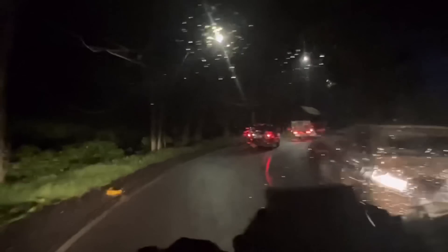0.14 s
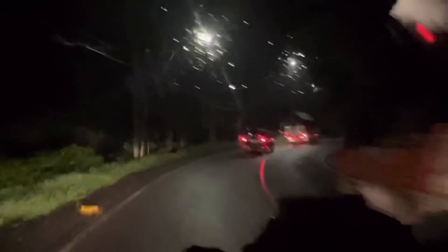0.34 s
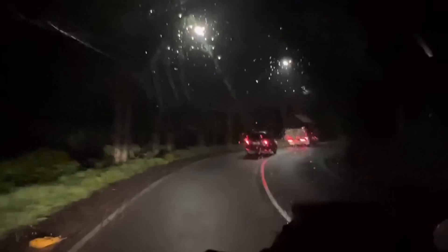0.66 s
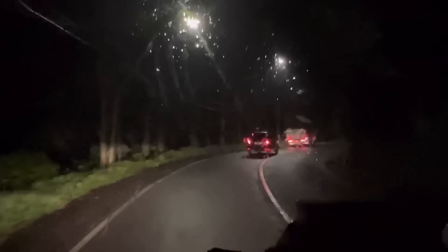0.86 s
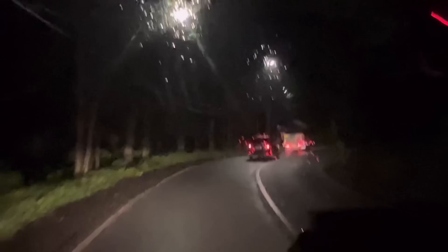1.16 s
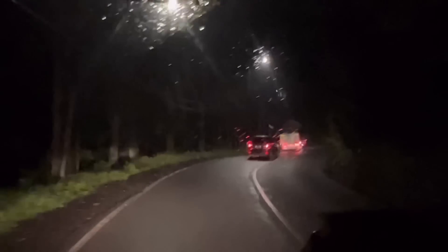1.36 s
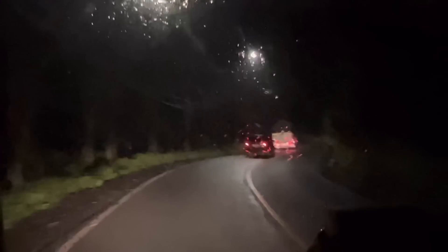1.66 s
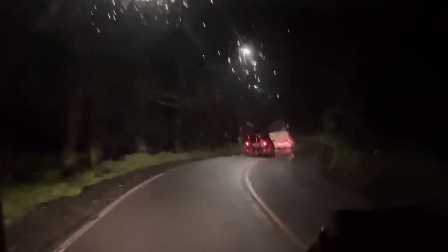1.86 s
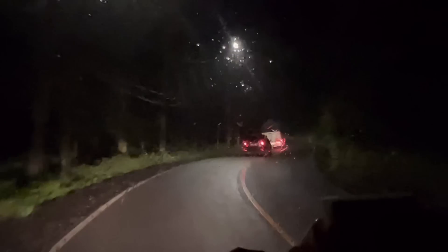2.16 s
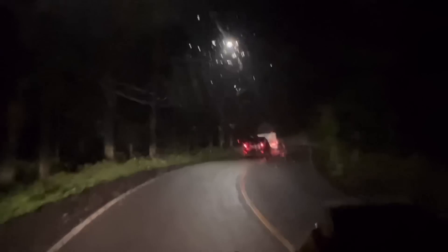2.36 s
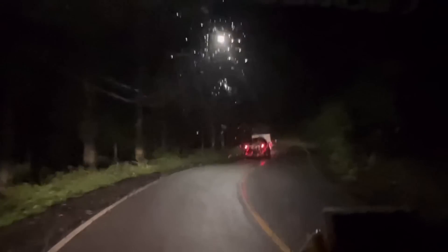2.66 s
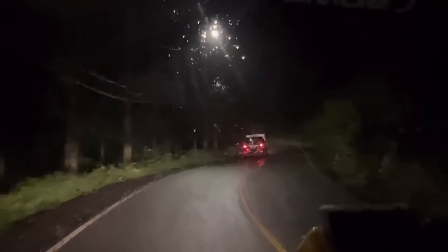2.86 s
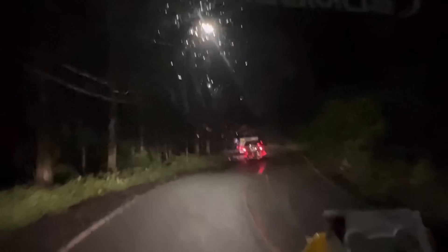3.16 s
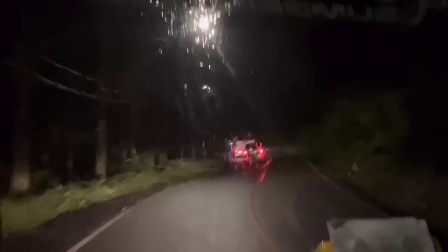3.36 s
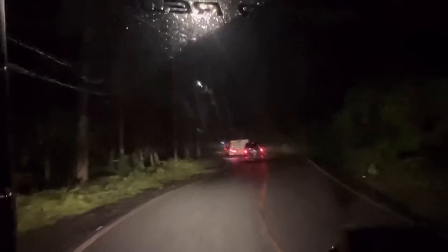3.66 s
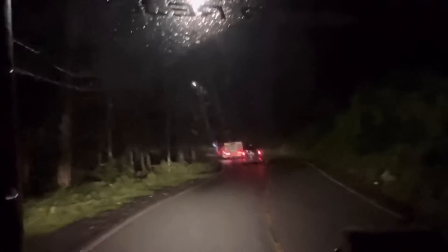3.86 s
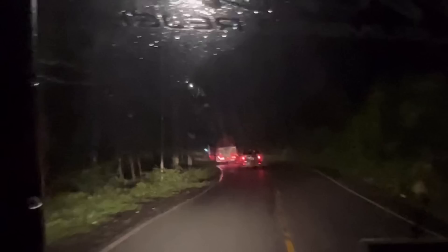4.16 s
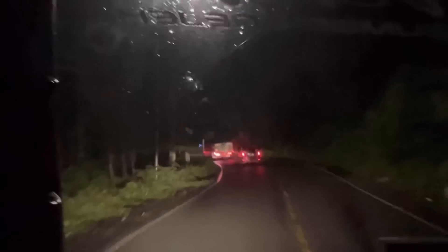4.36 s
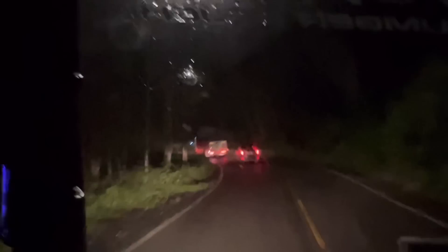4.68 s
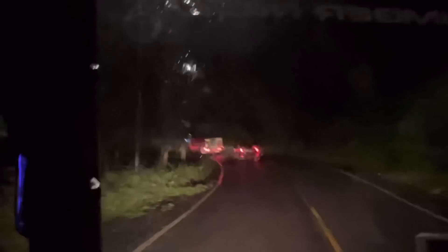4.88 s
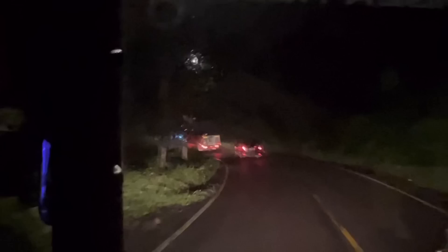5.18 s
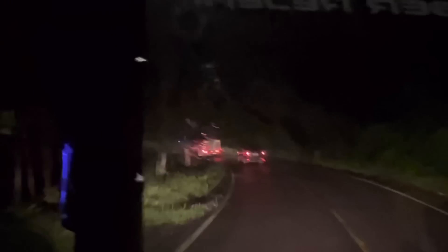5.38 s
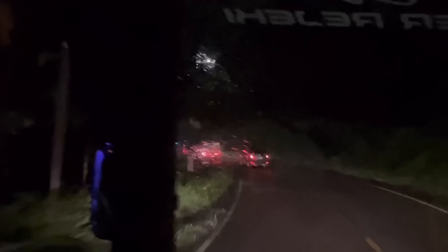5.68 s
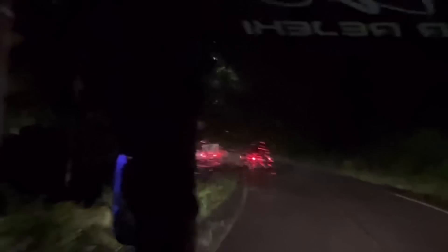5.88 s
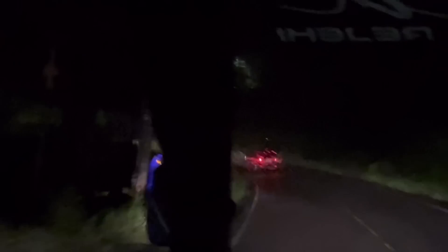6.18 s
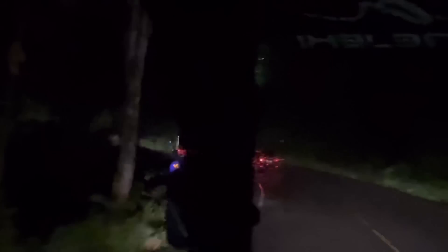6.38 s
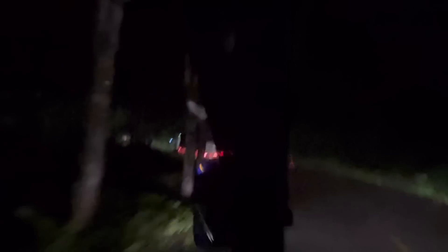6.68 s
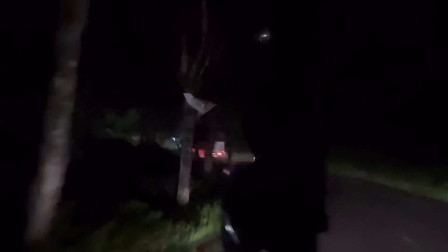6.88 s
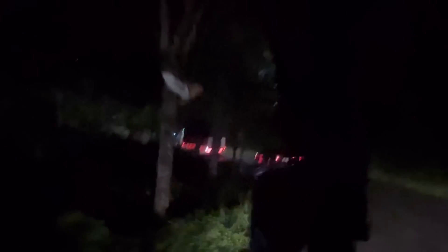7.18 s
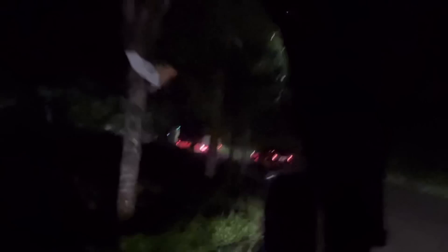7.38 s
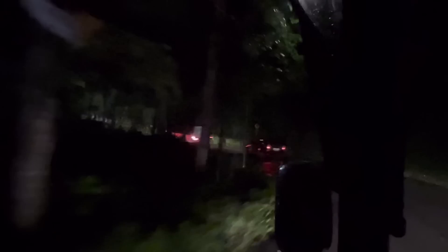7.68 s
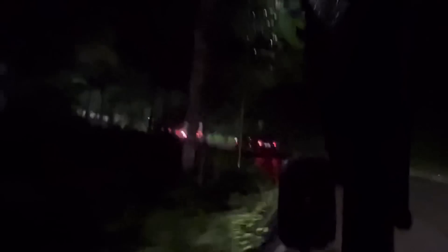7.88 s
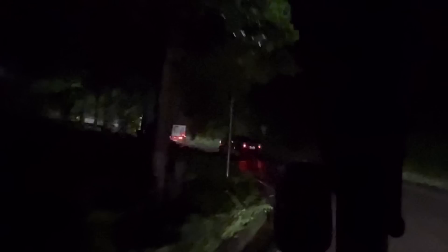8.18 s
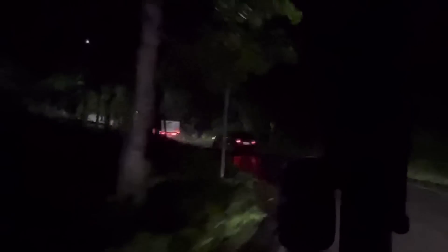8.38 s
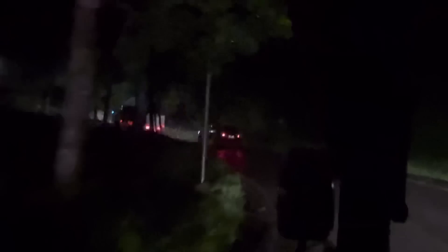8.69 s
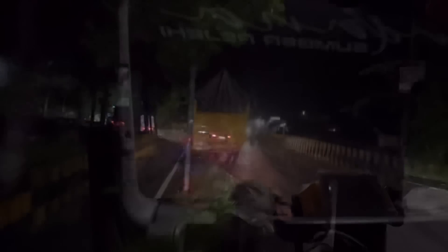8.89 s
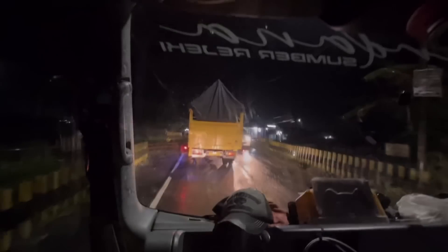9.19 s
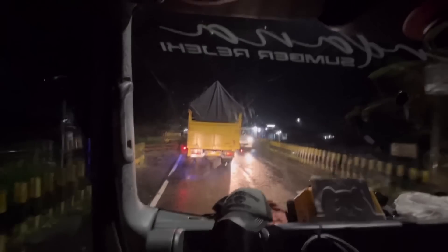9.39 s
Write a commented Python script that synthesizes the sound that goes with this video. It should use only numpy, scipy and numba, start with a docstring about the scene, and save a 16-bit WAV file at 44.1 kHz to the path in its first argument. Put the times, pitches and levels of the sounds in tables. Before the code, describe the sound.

A truck engine runs along a wet road, heard on a phone inside the cab with a side window open. Its low hum and growl climb slowly in pitch over deep body rumble, road roar, hissing spray and faintly ringing panels. Two oncoming cars swish past in the first second. From about 1.5 seconds a fluttering gear whine comes in, rising and growing louder, while a thin, high draught hiss drifts above. A few isolated gusts bump the microphone between 2 and 5.5 seconds. From about 6 to 9 seconds the wind thumps and slaps it in quick, irregular bursts, strongest around 6.5 to 7.3 seconds. The engine hum drops away between 7 and 8 seconds, leaving rumble, whine and wind. Around 9 seconds the road noise falls off and a slower, lower engine comes in, rising slightly until the end at 9.5 seconds.

```python
"""A truck engine pulls up a wet road at night, heard on a phone in the cab with the side window open.
Its firing makes a hum and a growl, joined by a cab drone and a gear whine, over body rumble, road roar
and spray hiss. A thin high hiss drifts, a draught sings, and oncoming cars swish past at the start.
Gusts thump and slap the phone's two microphone openings (ports), most of all around the time it turns
to the window. At the end the noise falls away and a slower engine takes over."""
import sys
import numpy as np
from scipy import signal
from scipy.fft import rfft, irfft, next_fast_len
from scipy.io import wavfile
from scipy.ndimage import uniform_filter1d
from numba import njit

SR = 44100
rng = np.random.default_rng(int(sys.argv[2]) if len(sys.argv) > 2 else 0)


def dump(signal):
    """Clip the signal to [-1, 1] and save it as 16-bit WAV at the path in sys.argv[1]."""
    limited = np.clip(np.atleast_2d(signal).T, -1, 1)
    pcm = np.round(limited * 32767).astype(np.int16)
    wavfile.write(sys.argv[1], SR, pcm)


N = 420713
T = np.arange(N) / SR
SIZE = next_fast_len(N)
HZ = np.arange(SIZE // 2 + 1) * SR / SIZE + 1e-3

# Levels in the tables are relative; the mix sets the final loudness.
# The engine. Each row: time in seconds, firing rate in Hz, load in dB.
ENGINE = [(0, 60.72, 0), (.8, 62.38, 0.5), (1.3, 63.5, -0.5), (2.0, 67.26, -1.5), (3.2, 71.03, -1.5),
          (4.8, 73.89, 1), (6.0, 74.77, 0.5), (6.8, 76.6, 2), (7.3, 76.56, -10), (8.0, 75.6, -15)]
# How the cab passes low and high multiples of the firing rate. Each row: frequency in Hz, level in dB.
CAB_LOW = [(60, -18.5), (62.3, -17.5), (63.3, -28.5), (65.5, -32), (67, -16.5), (71, -20.5), (74.2, -28.5),
           (76, -31), (121, -27.5), (126, -26.5), (131, -27), (136, -26), (142, -28.5), (146, -25),
           (154, -26.5), (183, -54), (204, -41), (226, -40)]
CAB_HIGH = [(230, -47), (260, -45), (320, -45.5), (380, -60), (440, -56), (500, -52), (580, -56),
            (660, -56), (730, -49), (790, -48), (880, -58), (960, -55), (1030, -50), (1100, -58),
            (1200, -54), (1270, -54), (1330, -54.5), (1450, -63), (1800, -64)]
# Three sounds that drift in pitch. Each row: time in seconds, pitch in Hz, level in dB.
DRONE = [(0, 79.5, -30), (1.2, 80.5, -25), (2.0, 78.4, -24), (3.2, 78.6, -24), (3.7, 79.5, -25),
         (4.4, 79.5, -23.5), (6.0, 81.4, -26), (6.4, 83, -31), (7.9, 84, -50), (8.4, 83, -22),
         (8.8, 84.5, -39)]
HIGH_HISS = [(0, 9800, -48.5), (1, 10260, -47), (4.7, 10530, -42), (5.6, 9524, -38), (6.1, 9700, -39.5),
             (6.5, 10550, -42), (7, 9540, -38), (7.5, 9510, -35.5), (8, 9060, -37.5), (9.1, 8980, -44),
             (9.54, 9200, -76)]
WHINE = [(1.6, 381.4, -42), (2.3, 386.7, -44), (3.0, 395.9, -36.5), (3.6, 404.3, -35.5), (4.0, 412.5, -33),
         (4.5, 418.6, -32), (5.1, 422.3, -29), (5.6, 423.5, -30), (6.2, 428.8, -31.5), (6.9, 428.5, -25),
         (7.4, 429.3, -33.5), (8.05, 431, -25), (8.35, 425.6, -42), (8.7, 420, -43), (9.0, 415, -41)]
# Ringing panels. Each row: pitch in Hz, width in Hz, dB against the road roar at low revs,
# the same at high revs, dB added when facing the window.
PANELS = [(695, 16, -27, -20, -3), (774, 14, -20, -15, -10), (1041, 12, -16, -13, -6),
          (1185, 12, -27, -19, 1), (1284, 20, -16, -10, 1.5), (1557, 13, -30, -21, 9),
          (1663, 22.26, -23, -18, 8.5), (2404, 140, -15, -18.5, -11)]
# The tone colour of five noises. Each row: frequency in Hz, level in dB.
RUMBLE_COLOUR = [(20, -34), (35, -13.5), (50, -4), (62, 0.5), (72, -4), (85, -7), (105, -9.5), (135, -15),
                 (160, -16), (230, -28.5), (400, -27)]
RASP_COLOUR = [(100, -4), (200, -4), (290, -0.5), (350, -3.5), (450, -5), (620, -7), (750, -4), (880, -5),
               (1100, -8), (1310, -12), (1400, -13.5), (2500, -23)]
ROAR_COLOUR = [(500, -13.5), (1000, -6.5), (1500, -2), (1750, -3), (2050, -3.5), (2400, -6.5), (2700, -7.5),
               (3200, -8.5), (5000, -27)]
SPRAY_COLOUR = [(1500, -24), (3000, -6), (4500, -0.5), (6000, 2.5), (7000, 3), (9000, -1), (10200, -17),
                (11200, -15), (12300, -16), (13500, -21), (14300, -29), (15200, -21), (16000, -22)]
SINGING_COLOUR = [(5500, -18), (6700, -6), (7400, 4), (8000, -6), (9000, -14), (10000, -26.5)]
# Loudness of the body rumble and the singing draught. Each row: time in seconds, level in dB.
RUMBLE_LEVEL = [(0, -22), (.8, -21), (1.6, -23.5), (2.2, -20), (3.3, -19.5), (4.7, -18), (5.9, -20),
                (6.2, -21), (6.62, -17.5), (6.93, -20.5), (7.5, -24), (7.9, -30.5), (8.5, -22.5),
                (9.4, -28), (9.54, -21.5)]
SINGING_LEVEL = [(0, -45.5), (1.3, -40), (1.9, -39.5), (2.6, -35), (4.5, -29), (5.2, -31.5), (5.9, -34),
                 (6.4, -31), (7.7, -31.5), (8.3, -38), (8.8, -37.5), (9.4, -54), (9.54, -54)]
# Oncoming cars throwing spray. Each row: middle in seconds, length in seconds.
PASSING_CARS = [(0, .25), (0.748, 0.36)]
# Draught on the ports between gusts. Each row: time in seconds, level in dB, air speed in m/s.
DRAUGHT = [(0, -50, 7.5), (2, -36, 6.1), (4, -37.5, 6.7), (5.8, -32, 5.04), (6.3, -24, 5.2),
           (6.9, -28.5, 6.5), (7.3, -21.5, 8.9), (7.4, -40, 5.1), (7.8, -33, 6.9), (8.6, -27, 12),
           (8.7, -55, 11), (9.22, -30.5, 8.2), (9.3, -45, 6.5), (9.54, -48, 5.9)]
# Gusts. Each row: middle in seconds, length in milliseconds, peak in dB, air speed in m/s.
GUSTS = [(2.363, 65, -22, 3), (4.231, 48, -23, 3.8), (4.466, 18.8, -17, 5), (4.549, 50, -17.5, 3.7),
         (5.396, 57, -18.5, 3.6), (5.972, 53, -20, 3.9), (6.053, 44, -17, 4.4), (6.196, 25, -11, 5.5),
         (6.246, 42, -20.5, 8.9), (6.316, 56, -20, 2.6), (6.505, 19, -10.5, 6.1), (6.572, 65, -15.5, 5.6),
         (6.645, 49, -10.5, 4.4), (6.795, 77, -21.5, 6.5), (6.866, 37, -12, 6.2), (6.909, 30, -15.5, 6.2),
         (6.955, 42, -19.5, 9.2), (7.001, 37, -16.5, 12), (7.08, 17, -16.5, 9.4), (7.106, 22, -17, 8.9),
         (7.195, 43, -17, 8.7), (7.228, 33, -18, 13), (7.281, 42, -15, 5.5), (7.318, 30, -16, 6.3),
         (7.442, 37, -23, 8.1), (7.547, 114, -28, 11.6), (7.717, 24, -24, 8.6), (7.815, 46, -20, 8.1),
         (7.871, 29, -21.5, 11.8), (7.995, 34, -18.5, 7.4), (8.088, 62, -18, 11), (8.2, 24, -22, 9.8),
         (8.277, 45, -23, 8.1), (8.357, 36, -18.5, 10.2), (8.417, 58, -21, 13), (8.505, 28, -22, 16),
         (8.575, 29, -16, 13.3), (8.624, 24, -17, 11.3), (8.841, 41, -21.5, 9.7), (8.885, 45, -25, 10),
         (8.932, 36, -22.5, 10.3), (9.033, 30, -30, 13), (9.166, 19, -20, 8.2)]
# Slaps of air. Each row: middle in seconds, level in dB, pitch in Hz, left over right in dB.
SLAPS = [(4.464, -17, 300.4, -3), (5.386, -12, 220, 1), (6.427, -16, 450, 0), (6.439, -9, 388, 1),
         (8.352, -15, 560, 2), (9.027, -15.5, 600, 2), (6.195, -12.0, 365.0, 1.0), (6.205, -8, 484.0, 3.0),
         (6.501, -7, 373.0, -2.0), (6.566, -15, 359.0, 5), (6.628, -21, 362.0, 5), (6.644, -5.5, 421.0, -1),
         (6.656, -16, 324.0, 6.0), (6.856, -5, 417.0, -3.0), (6.867, -9, 366.0, 4),
         (6.902, -11, 389.0, 10.0), (6.937, -8, 393, 4.0), (6.997, -14, 457.0, 0), (7.009, -15, 389.0, 1),
         (7.08, -8, 430, 1.0), (7.107, -5.0, 388.0, 1.0), (7.183, -6, 432.0, 4.0), (7.194, -13, 362.0, 1.0),
         (7.202, -8, 425.0, 0), (7.235, -5, 475.0, -2.0), (7.256, -6.0, 452.0, 1.0),
         (7.264, -1.5, 550.0, 1.0), (7.276, -6, 352, 3.0), (7.312, -12.0, 447.0, 1.0),
         (7.32, -6.5, 373.0, 3.0), (7.429, -17, 456.0, 4.0), (7.726, -14.0, 388.0, 5.0),
         (7.824, -19, 381.0, 6.0), (7.866, -12, 505.0, 4.0), (7.988, -16, 395.0, 4.0),
         (8.063, -7, 418.0, -1.0), (8.071, -13, 431.0, 1.0), (8.101, -11, 440, -2),
         (8.114, -11.0, 488.0, 5.0), (8.356, -15, 388.0, 3), (8.402, -10, 542.0, 1.0),
         (8.432, -14, 442, 7.0), (8.443, -10, 483.0, -3), (8.581, -7, 509.0, 0), (8.61, -9, 577.0, 0.0),
         (8.629, -9, 406.0, -4), (8.839, -15, 403.0, 5), (8.873, -18, 618.0, 2), (8.892, -19, 517.0, 10.0),
         (8.927, -18, 404.0, 3.0), (9.164, -14, 401.0, 2.0)]
# Brief dips in the low noise. Each row: middle in seconds, length in seconds, change in dB.
LULLS = [(7.38, 0.041, -1), (7.668, 0.067, -3.5), (8.75, 0.13, -4), (8.983, 0.076, -3),
         (9.263, 0.048, -2.5)]
# How alike the two ports sound. Each row: frequency in Hz, shared part from 0 to 1.
LIKENESS = [(60, 0.96), (200, 0.58), (400, 0.3), (700, 0.31), (1300, 0.093), (2300, 0.17), (5000, 0.24),
            (7500, 0.11), (8500, 0.29), (9400, 1), (12000, .99)]
# The left port's lag, bent by cab echoes. Each row: frequency in Hz, lag in radians.
LEFT_LAG = [(60, -0.2), (200, 0.43), (500, 1.44), (700, 1.5), (860, 4), (1100, 1.5), (1700, 2),
            (2400, -0.5), (3100, -1.9), (6500, 0.2)]
# The hand shading the right port. Each row: frequency in Hz, dB against the left port.
HAND_SHADE = [(50, -1.5), (200, -3), (400, -2), (1000, -4.5), (2500, -1.5), (3300, -8), (5000, -12),
              (6800, -12), (7700, -3.5), (8700, -0.5), (16000, 0)]
# Noise levels in dB: at low revs, at high revs, added by a car, added at the window, after the fade.
RASP_DB = (-36, -25.5, 2.5, -1.5, -31)
ROAR_DB = (-39.5, -33.5, 2.5, 0, -41)
SPRAY_DB = (-42, -33.5, 4.5, 0, -42.5)


def undb(db):
    """Turn decibels into a gain."""
    return 10 ** (np.asarray(db) / 20)


def unit(x):
    """Scale a signal to an average strength (rms) of 1."""
    return x / np.sqrt(np.mean(x ** 2))


def over_hz(table):
    """Join a table's points into a smooth curve over frequency."""
    hz, value = np.transpose(table)
    return np.interp(np.log(HZ), np.log(hz), value)


def over_time(table):
    """A table's columns as curves, plus a gate that fades any start or stop inside the scene."""
    s, *columns = np.transpose(table)
    fade_in = (T - s[0]) / .04 + (s[0] <= 0)
    fade_out = (s[-1] - T) / .04 + (s[-1] > 9.5)
    return [np.interp(T, s, c) for c in columns] + [np.clip(np.minimum(fade_in, fade_out), 0, 1)]


def walk(rate):
    """A smooth random wobble of size about 1, with `rate` new values a second."""
    hold = int(SR / rate)
    steps = np.repeat(rng.standard_normal(N // hold + 1), hold)
    return 1.3 * uniform_filter1d(uniform_filter1d(steps, hold), hold)[:N]


def bump(s, length):
    """A blunt rise and fall that reaches 1 at time s."""
    return np.exp(-np.log(2) * (np.abs(T - s) / (length / 2)) ** 4)


@njit
def moving_filter(x, hz, damping, lowpass):
    """Keep the sound near a moving frequency, or all below it if lowpass is set."""
    y, band, low = np.empty(len(x)), 0., 0.
    for i in range(len(x)):
        g = np.tan(np.pi * hz[i] / SR)
        v = (band + g * (x[i] - low)) / (1 + g * (g + damping))
        y[i] = low + g * v if lowpass else damping * v
        band, low = 2 * v - band, low + 2 * g * v
    return y


def narrow_noise(hz, damping):
    """Noise around one pitch; less damping makes it narrower."""
    return moving_filter(rng.standard_normal(N), hz, damping, False)


def ports(common, own, share):
    """Spectra at both ports: a shared part, shifted on the left, plus each port's own part."""
    share = np.clip(share, 0, 1)
    # high up, the left port is flipped and hears the path round the case, 13 samples late
    round_case = -np.exp(-2j * np.pi * HZ * 13 / SR)
    left = np.where(HZ < 6500, np.exp(-1j * over_hz(LEFT_LAG)), round_case)
    return np.sqrt(share) * common * np.array([left, np.ones_like(left)]) + np.sqrt(1 - share) * own


def wide_noise(colour, swell_db, flicker_db):
    """Coloured noise at both ports; its octaves swell together and flicker alone."""
    common, *own = rfft(rng.standard_normal((3, SIZE)))
    pair = ports(common, np.array(own), over_hz(LIKENESS)) * undb(over_hz(colour))
    out, swell = 0, swell_db * walk(1.46)
    for octave in np.arange(np.floor(np.log2(colour[0][0])), np.log2(colour[-1][0]) + 1):
        band = np.cos(np.pi / 2 * np.clip(np.log2(HZ) - octave, -1, 1)) ** 2
        out = out + undb(swell + flicker_db * walk(9)) * irfft(pair * band, SIZE)[:, :N]
    return unit(out)


def tones(hz, levels_db, gate, waver, flutter_db, pace=8):
    """Multiples of one slightly wavering pitch, each fluttering in level."""
    phase = 2 * np.pi * np.cumsum(hz * (1 + waver * walk(6))) / SR
    return gate * np.sqrt(2) * sum(undb(db + flutter_db * walk(pace)) * np.sin((k + 1) * phase + k)
                                   for k, db in enumerate(levels_db))


def revs(low_hz=60, high_hz=77):
    """How fast the engine fires: 0 at low revs, 1 at high revs."""
    return (over_time(ENGINE)[0] - low_hz) / (high_hz - low_hz)


def passing():
    """How near an oncoming car is, from 0 to 1."""
    return sum(bump(s, length) for s, length in PASSING_CARS)


def facing(start_s=6.9, length_s=.3):
    """How far the phone has turned to the window, from 0 to 1."""
    return np.clip((T - start_s) / length_s, 0, 1)


def driving_gain(low_db, high_db, car_db, window_db, end_db):
    """Noise grows with the revs and passing cars, fades late on, then rises at the very end."""
    driving_db = low_db + (high_db - low_db) * revs() + car_db * passing() + window_db * facing()
    fade = np.clip((T - 8.64) / .53, 0, 1)
    recovery_db = 9.5 * np.maximum(T - 9.24, 0)
    return undb((1 - fade) * driving_db + fade * end_db + recovery_db)


def engine_hum():
    """The first three multiples of the firing rate, shaped by the cab."""
    hz, load_db, gate = over_time(ENGINE)
    levels_db = [load_db + np.interp(k * hz, *np.transpose(CAB_LOW)) for k in range(1, 4)]
    return tones(hz, levels_db, gate, waver=.0015, flutter_db=1.44)


def engine_growl(rise_db=4.5, flutter_db=2.5):
    """Higher multiples of the firing rate, each swelling as it crosses a pitch where the cab rings."""
    hz, _, gate = over_time(ENGINE)
    phase = 2 * np.pi * np.cumsum(hz * (1 + .001195 * walk(6))) / SR
    out = 0
    for k in range(4, 24):
        db = np.interp(k * hz, *np.transpose(CAB_HIGH)) + rise_db * revs() + flutter_db * walk(2.446)
        out = out + undb(db) * np.sin(k * phase + k * k)
    return gate * np.sqrt(2) * out


def cab_drone():
    """The cab drones on one low, wavering note."""
    hz, db, gate = over_time(DRONE)
    return tones(hz, [db], gate, waver=.0043, flutter_db=1.4)


def body_rumble(throb_db=1.5, throbs_per_s=12):
    """The truck's body rumbles: deep noise with an uneven throb."""
    db = over_time(RUMBLE_LEVEL)[0] + throb_db * walk(throbs_per_s)
    return undb(db) * wide_noise(RUMBLE_COLOUR, swell_db=.79, flicker_db=1.04)


def engine_rasp():
    """Rough noise from the engine bay that follows the revs."""
    return driving_gain(*RASP_DB) * wide_noise(RASP_COLOUR, swell_db=.33, flicker_db=1.56)


def wet_road():
    """The road roars in the middle range and its spray hisses above."""
    roar = driving_gain(*ROAR_DB) * wide_noise(ROAR_COLOUR, swell_db=.098, flicker_db=1)
    spray = driving_gain(*SPRAY_DB) * wide_noise(SPRAY_COLOUR, swell_db=.15, flicker_db=.67)
    return roar + spray


def ringing_panels(flutter_db=1.5):
    """The road shakes panels, each ringing roughly around its own pitch."""
    out = 0
    for hz, width, low_db, high_db, window_db in PANELS:
        db = low_db + (high_db - low_db) * revs() + window_db * facing() + flutter_db * walk(4.3)
        wandering_hz = hz * (1 + .0039 * walk(1.46))
        out = out + undb(db) * unit(narrow_noise(wandering_hz, width / hz))
    return driving_gain(*ROAR_DB) * out


def high_hiss(damping=.19, car_db=8.5):
    """A thin, drifting hiss, like air through a narrow gap; louder as a car passes."""
    hz, db, _ = over_time(HIGH_HISS)
    gain = undb(db + car_db * passing() + walk(15))
    return gain * unit(moving_filter(narrow_noise(hz, damping), hz, damping, False))


def singing_draught(car_db=6.5):
    """The draught sings in a hollow: high noise with one peak, louder as a car passes."""
    db = over_time(SINGING_LEVEL)[0] + car_db * passing()
    return undb(db) * wide_noise(SINGING_COLOUR, swell_db=.28, flicker_db=.72)


def eddies(per_s=1500, scatter_db=2.5):
    """Tiny swirls of air burst on a port as pressure kicks, a few much larger than the rest."""
    kicks = (rng.random(N) < per_s / SR) * rng.standard_normal(N)
    return kicks * undb(scatter_db * rng.standard_exponential(N))


def wind_on_ports(eddy_size_m=.02, damping=1.35, throb_db=1.05):
    """Draught and gusts drive eddies onto the ports; faster air makes a brighter thump."""
    db, speed, _ = over_time(DRAUGHT)
    power = undb(db) ** 2
    weighted_speed = power * speed
    for s, ms, peak_db, gust_speed in GUSTS:
        half_lengths_away = np.minimum(np.abs(T - s) / (ms / 2000), 6)
        gust_power = undb(peak_db - 6 * half_lengths_away ** 3.3) ** 2
        power += gust_power
        weighted_speed += gust_power * gust_speed
    top_hz = np.clip(weighted_speed / power / eddy_size_m, 100, 2000)
    common, *own = rfft([eddies() for _ in range(3)], SIZE)
    kicks = irfft(ports(common, np.array(own), share=.67), SIZE)[:, :N]
    thump = unit(signal.sosfilt(signal.butter(2, 90, "high", fs=SR, output="sos"), kicks))
    for _ in range(2):
        thump = np.array([moving_filter(port, top_hz, damping, True) for port in thump])
    # even out the kicks, so that draught and gusts set the level
    strength = np.sqrt(uniform_filter1d(uniform_filter1d(np.mean(thump ** 2, 0), 700), 700))
    return undb(2.5 + throb_db * walk(40)) * np.sqrt(power) * thump / strength


def gear_whine(rattle_db=-9):
    """The gears whine on three fluttering tones, with a rattle of noise around the lowest."""
    hz, db, gate = over_time(WHINE)
    rattle = gate * undb(db + rattle_db) * unit(narrow_noise(hz, damping=.09))
    return rattle + tones(hz, [db - 1, db - 19, db - 23], gate, waver=.001974, flutter_db=3.2, pace=45)


def air_slaps(cycles=.59, snap_db=-7.5, gain_db=-2.5):
    """Each slap is a short pressure jump with a snap an octave up, most nearer one port."""
    out, half = np.zeros((2, N)), SR // 50
    t = np.arange(-half, half) / SR
    for (s, db, hz, pan_db), push in zip(SLAPS, rng.choice([-1, 1], size=len(SLAPS))):
        jump, snap = (np.cos(2 * np.pi * f * t - np.pi / 4) * np.exp(-(t * f / cycles) ** 2)
                      for f in (hz, 2 * hz))
        gains = undb(db + gain_db + np.array([[pan_db], [-pan_db]]) / 2)
        start = int(s * SR) - half
        out[:, start:start + len(t)] += gains * push * (jump + undb(snap_db) * snap)
    return out


def lulls():
    """A gain that makes the low noise dip briefly."""
    return undb(sum(db * bump(s, length) for s, length, db in LULLS))


def slow_engine(start_s=9, firing_hz=35.3, climb_hz_per_s=4.9, swell_db_per_s=9.5):
    """A slower engine's firing hum comes in, rising in pitch and level."""
    since = np.maximum(T - start_s, 0)
    levels_db = [db + swell_db_per_s * since for db in (-33.5, -38, -42.5)]
    fade_in = np.minimum(since / .045, 1)
    return tones(firing_hz + climb_hz_per_s * since, levels_db, fade_in, waver=.0047, flutter_db=3.8)


def scene():
    """Pitched sounds reach both ports through the air; wide noise and wind differ at each port."""
    pitched = engine_hum() + engine_growl() + cab_drone() + ringing_panels() + high_hiss()
    pitched += gear_whine() + slow_engine()
    airborne = undb(1.5) * irfft(ports(rfft(pitched, SIZE), own=0, share=.9), SIZE)[:, :N]
    low_noise = body_rumble() + engine_rasp() + wind_on_ports() + air_slaps()
    return airborne + lulls() * low_noise + wet_road() + singing_draught()


def record(dry, ceiling=.97, top_hz=15850):
    """The hand shades the right port; the phone rounds off peaks and cuts the highest treble."""
    shade = np.array([np.ones_like(HZ), undb(over_hz(HAND_SHADE))])
    shaded = irfft(rfft(dry, SIZE) * shade, SIZE)[:, :N]
    rounded = shaded / (1 + (shaded / ceiling) ** 4) ** .25
    return signal.sosfilt(signal.ellip(10, .2, 80, top_hz, fs=SR, output="sos"), rounded)


dry = scene()
out = record(dry)
dump(out)
```